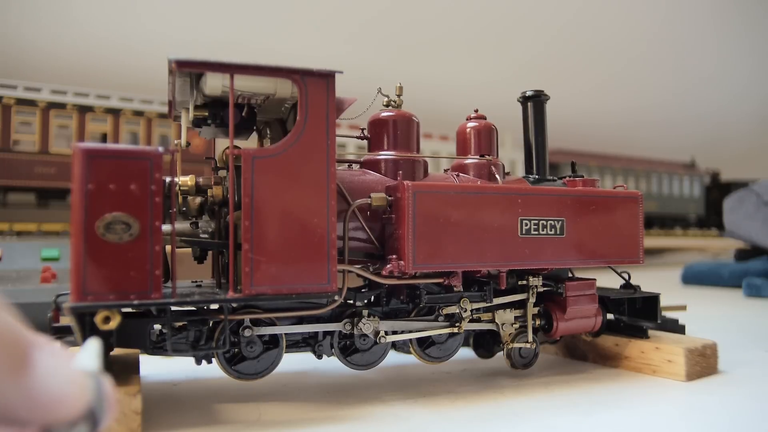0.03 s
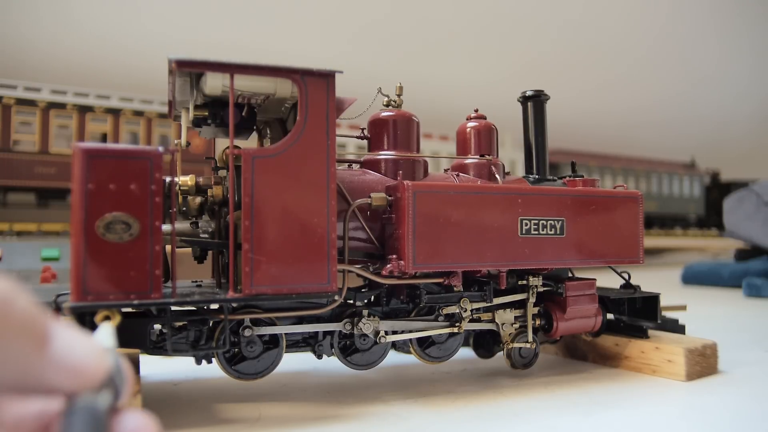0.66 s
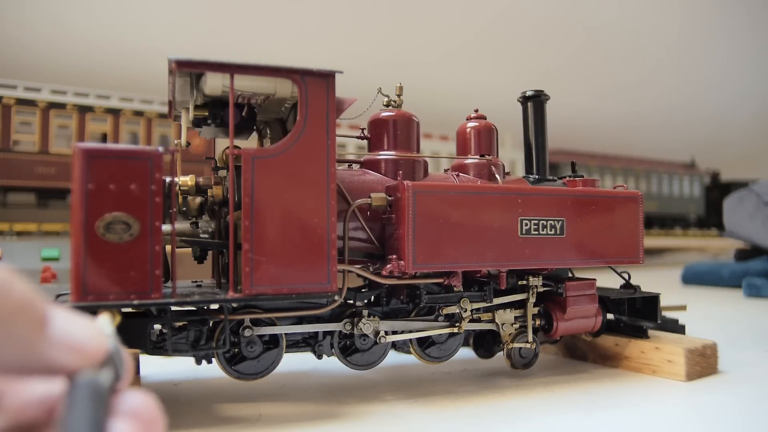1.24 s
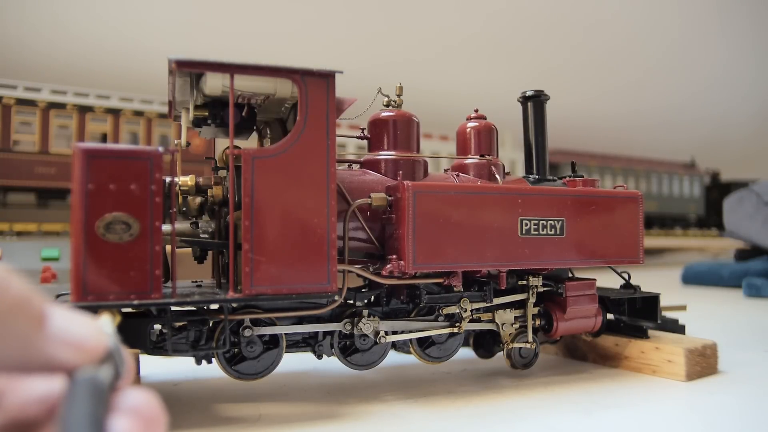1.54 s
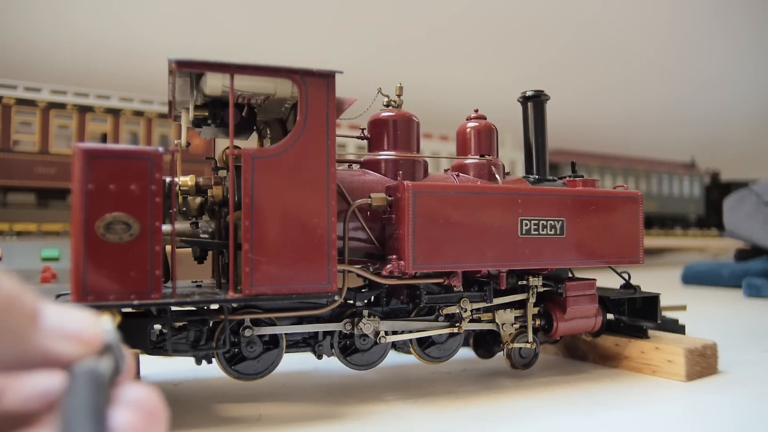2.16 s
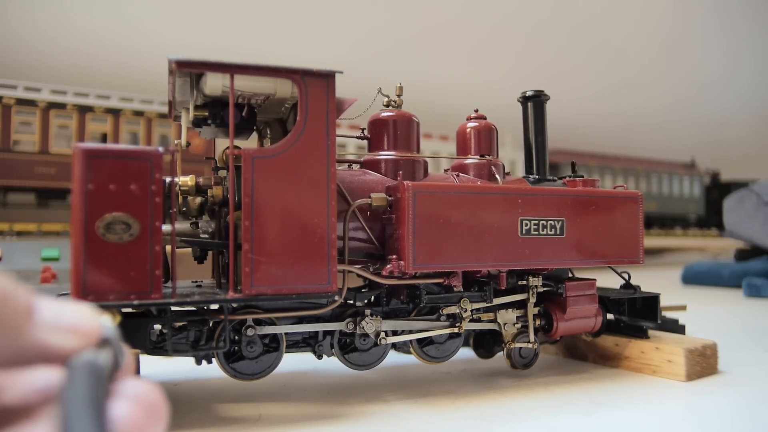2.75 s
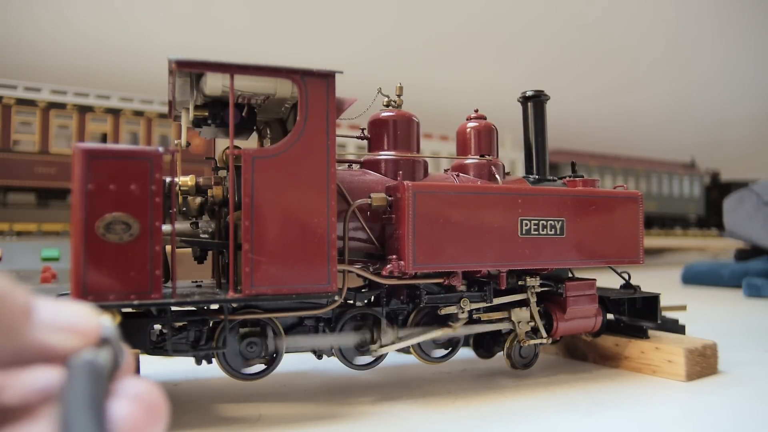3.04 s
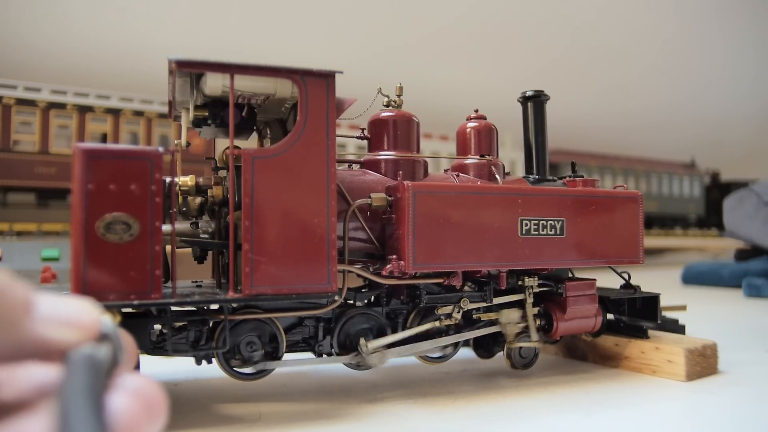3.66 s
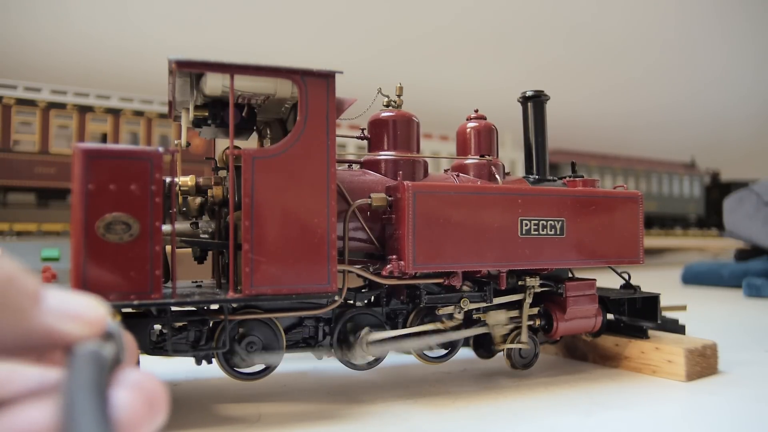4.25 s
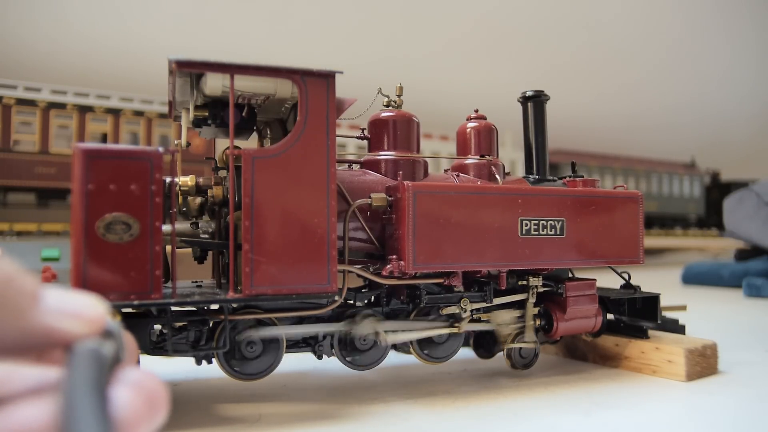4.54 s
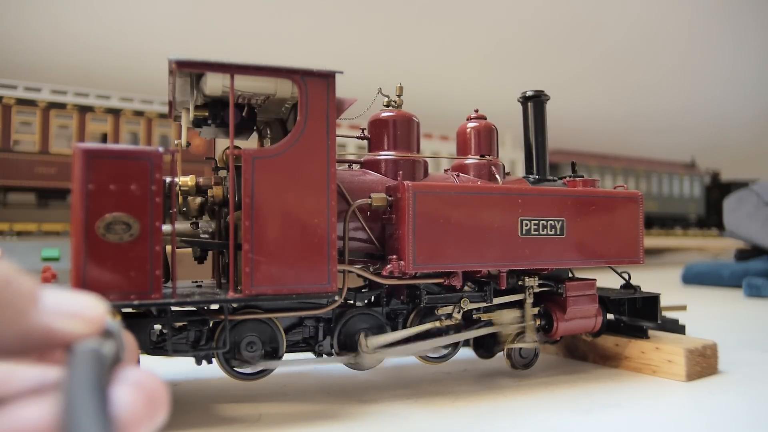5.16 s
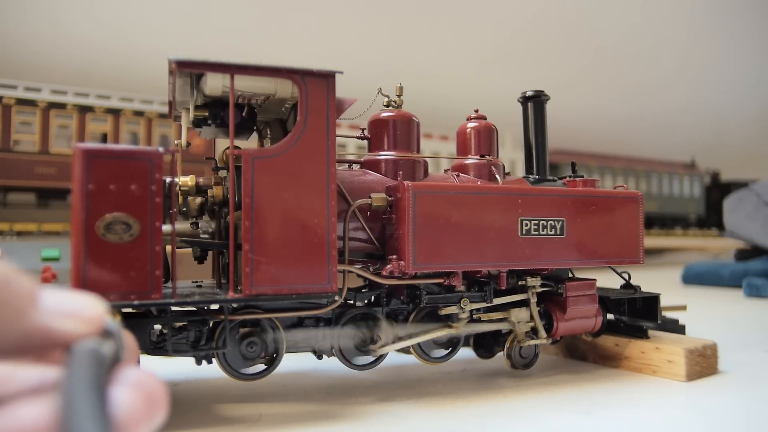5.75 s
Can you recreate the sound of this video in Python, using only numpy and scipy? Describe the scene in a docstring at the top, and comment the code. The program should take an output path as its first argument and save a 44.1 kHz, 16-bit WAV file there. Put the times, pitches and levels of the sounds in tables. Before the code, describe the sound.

A little air compressor starts with a brief surge and hums steadily, heard up close on an indoor workbench. A bright, throbbing hiss spits and whistles from a loose hose nozzle at a model locomotive's inlet. The engine begins puffing softly and rapidly as its wheels spin. Roughly two thirds through, the joint seals and the hiss sinks low, while the compressor carries on under load with a rapid valve rasp and thin squeak.

```python
"""A small piston compressor starts up and hums, close to a single microphone at an indoor bench.
Air hisses and whistles past a hose nozzle as a hand pushes it into the inlet of a model steam
locomotive on blocks. The nozzle seats, the hiss falls away and the building pressure makes the
compressor's valves rasp and squeak. The wheels begin to spin, with soft chuffs from the chimney."""
import sys
import numpy as np
from scipy import signal
from scipy.fft import rfft, irfft
from scipy.io import wavfile
from scipy.ndimage import uniform_filter1d

SR = 44100
rng = np.random.default_rng(int(sys.argv[2]) if len(sys.argv) > 2 else 0)


def generate_wav(signal):
    """Clip the signal to [-1, 1] and save it as 16-bit WAV at the path in sys.argv[1]."""
    frames = np.transpose(np.atleast_2d(signal))
    scaled = np.clip(frames, -1, 1) * 32767
    pcm = np.round(scaled).astype(np.int16)
    wavfile.write(sys.argv[1], SR, pcm)


N = 260631
T = np.arange(N) / SR


# The intake's hum, running light. Each row: multiple of the stroke rate, relative level in dB.
HUM_LIGHT_PARTIALS = [(1, -48), (2, -25.5), (3, -17), (4, -29), (5, -42), (6, -23.5), (7, -43), (8, -10.5),
                      (9, -20.5), (10, -12), (11, -5.5), (12, -3.5), (13, 1), (14, -4.5), (15, -21),
                      (16, -27), (17, -24), (18, -15.5), (19, -39), (20, -13), (21, -44), (22, -35),
                      (23, -30), (24, -30), (25, -39), (26, -15.5), (27, -12)]
# The same hum under load. Each row: multiple of the stroke rate, relative level in dB.
HUM_LOADED_PARTIALS = [(1, -40), (2, -11), (3, -11), (4, -15), (5, -38), (6, -18), (7, -20), (8, 2),
                       (9, 4.5), (10, -13), (11, 1.5), (12, 1), (13, 3.5), (14, 1.5), (15, -45), (16, -17),
                       (17, -25), (18, -13), (19, -25), (20, -18), (21, -31), (22, -28), (23, -16),
                       (24, -39), (25, -28), (26, -17), (27, -6)]

def hum(turns, speed, pressure, smear=0.0658, flutter_turns=0.00053, soft_db=7):
    """Each stroke thumps the pump body, then the gulp rings the intake; load deepens the ring."""
    order, light_db = np.transpose(HUM_LIGHT_PARTIALS)
    loaded_db = np.transpose(HUM_LOADED_PARTIALS)[1]
    share = speed / speed[-1]
    # extra load as the motor reaches full speed, soon easing
    strain = 0.92 * np.clip(2 * share - 1, 0, 1) ** 2 * np.exp(-T / 0.43)
    load = np.clip(pressure ** 2 + strain, 0, 1)
    lead_turns = 0.13 + 0.2 * load  # the body thumps ahead of the ring
    body_low, body_high = 7, 10  # multiples of the stroke rate that the body radiates
    crank = turns + flutter_turns * wander(21)
    centre = order[np.argmax(light_db)]
    partials = np.zeros(N)
    for k in range(1, 2 * len(order)):
        place = k * share  # the resonance stays put while the motor runs up
        db = (1 - load) * np.interp(place, order, light_db, right=-90)
        db += load * np.interp(place, order, loaded_db, right=-90)
        db -= soft_db * np.maximum(1 - share, 0) * abs(place - centre)  # slow gulps are soft-edged
        ahead = lead_turns * (np.clip(place, body_low, body_high) - body_high)
        phase = 2 * np.pi * (k * crank + ahead) + smear * (place - centre) ** 2
        partials += share * from_db(db) * np.cos(phase)
    return hum_gain() * unit(partials)


# The running hum at the microphone. Each row: time in seconds, level in dB before the starting kick.
HUM_LEVELS = [(.45, -43), (1.2, -44.5), (3, -42), (3.95, -41.5), (4.35, -45), (5.9, -45.5)]

def hum_gain(on_s=.05, rise_s=0.015):
    """The compressor switches on, labours loudly through its first strokes and settles."""
    switch = np.clip((T - on_s) / rise_s, 0, 1)
    kick_db = 7.5 * np.exp(-((T - .175) / 0.097) ** 2)
    return switch * from_db(follow(HUM_LEVELS, T)[0] + kick_db)


def intake_tube(x, ring_hz=354, width_hz=14, share=0.15):
    """The intake tube keeps singing faintly between gulps."""
    return (1 - share / 2) * x + share * resonate(x, ring_hz, width_hz)


# Modes of the pump head. Each row: frequency in Hz, width in Hz, relative level in dB.
HEAD_MODES = [(1290, 83, -11.5), (1776, 59, -3.5), (2207, 63, 0), (2764, 48, -3), (2920, 19, 3),
              (3490, 88, -6.5)]

def pump_head(turns, speed, pressure, rasp_db=-42, knock=1.25, pipe_db=-49):
    """The delivery valve knocks open, air rasps through the pump head, and the pipe rings on."""
    knocks = tap(turns + 0.0018 * wander(36), .82) + .5 * tap(turns + .01 * wander(30), .92)
    rush = snap(turns, 0.74, decay=0.27) * gate(turns, 0.98, spread=0.11) * rng.standard_normal(N)
    rasp = ring(unit(rush) + knock * unit(knocks), HEAD_MODES) * per_stroke(turns, 0.64, spread_db=0.34)
    tail = gate(turns, 0.18, spread=0.26) * rng.standard_normal(N)
    pipe = unit(resonate(resonate(tail, 3573, 82), 3465, 200))
    force = np.clip(pressure, 0, 1) ** 0.41 * (speed / speed[-1]) ** 2
    return force * (from_db(rasp_db) * rasp + from_db(pipe_db) * pipe)


# Modes of the outlet reed. Each row: frequency in Hz, width in Hz, relative level in dB.
REED_MODES = [(5830, 82, -9), (6577, 56, 1), (6920, 260, -15), (7120, 80, -8.5), (7370, 230, -11),
              (7800, 270, -29)]

def outlet_reed(turns, pressure, squeak_db=-44, breath=0.2):
    """Under pressure the outlet reed slaps twice a stroke and squeaks."""
    slaps = tap(turns, .52) + tap(turns + 0.0009 * wander(28), .655)
    flow = gate(turns, 0.54, spread=.035) * rng.standard_normal(N)
    squeak = ring(unit(slaps) + breath * unit(flow), REED_MODES) * per_stroke(turns, .3, spread_db=-1.75)
    return from_db(squeak_db) * np.clip(pressure, 0, 1) * squeak


# Breathy whistles at the nozzle's lip as it shifts in its seat. Each row: start and end in seconds,
# pitch in Hz, width in Hz, level in dB before the throb.
LIP_WHISTLES = [(0.03, .35, 2910, 250, -45.5), (0.03, 0.668, 10130, 320, -27),
                (0.123, 0.14, 9500, 1800, -28.5), (0.195, 0.524, 9500, 2000, -27),
                (.55, 1.6, 10540, 700, -40), (0.754, 0.865, 10500, 2400, -25),
                (0.903, 1.613, 5600, 1900, -34.5), (1.33, 1.95, 8470, 200, -53),
                (1.347, 1.646, 8600, 2190, -24), (2.046, 2.75, 7900, 200, -39.5),
                (2.1, 2.81, 1610, 450, -44), (2.113, 3, 9160, 704, -39), (2.653, 3.85, 5630, 480, -39),
                (2.7, 3.8, 6750, 400, -44), (2.9, 3.8, 4190, 350, -42.5), (3.137, 3.6, 9040, 340, -35.5),
                (3.5, 3.9, 6940, 2600, -35.5)]

def leak(turns, pressure, throb_db=3, start_throb_db=7, sputter_db=0.88, tremor_db=.5):
    """Escaping air surges with each stroke, most while the hose is empty; a loose nozzle trembles."""
    air = noise(jet_colour)
    for start, end, hz, width, db in LIP_WHISTLES:
        air = air + from_db(db) * arch(T, start, end) * whistle(hz, width)
    arrived = np.clip((T - 0.1205) / .003, 0, 1)
    trickle_db = -3.5 * (1 - arrived)  # less escapes until the first full stroke arrives
    surge = gate(turns, 0.74, spread=0.21)
    depth_db = throb_db * (1 - .5 * pressure) + start_throb_db * np.exp(-(T / 0.26) ** 2) * arrived
    unsteady_db = sputter_db * wander(170) + tremor_db * nozzle_gap(T) * wander(12)
    return air * from_db(trickle_db + depth_db * (surge - surge.mean()) + unsteady_db)


def whistle(hz, width_hz):
    """Turbulence caught in a sharp resonance; rms 1."""
    return unit(resonate(resonate(rng.standard_normal(N), hz, width_hz), hz, width_hz))


# Strength of the escaping air. Each row: time in seconds, density in dB per Hz before colouring.
JET_FLOW = [(0, -82.5), (.15, -79.5), (.24, -74), (.48, -73), (.72, -71.5), (1.25, -73), (1.9, -72.5),
            (2.12, -76), (2.4, -74), (3.3, -73), (3.8, -73), (3.92, -78.5), (4.08, -82), (4.16, -87.5),
            (5.9, -84)]
# The jet with the nozzle seated, pressed in and loose. Each row: low rush in dB, fizz in dB,
# then the gap resonance's lift in dB, frequency in Hz and width in Hz.
GAP_COLOURS = [(3.5, 1, 5, 7400, 1300), (-1.5, -5.5, 4, 9130, 3130), (-7, -0.5, 13.5, 10150, 4360)]
# The nozzle rocks and the jet's brightness shifts. Each row: start and end in seconds, fizz in dB.
JET_FLARES = [(0.872, 1.38, 2), (1.394, 1.698, -0.5), (3.514, 3.924, 8), (3.947, 4.14, 4),
              (4.72, 4.97, 4.5)]
# Resonances of the inlet pipe and cab. Each row: frequency in Hz, width in Hz, nominal lift in dB.
CAVITY_MODES = [(1450, 280, 6.4), (2230, 170, 6), (2894, 257, 3.8), (3434, 240, 6.4), (4186, 273, 3.9),
                (4535, 107, 2.8), (5445, 93, 3.6), (5703, 154, 4.1), (6167, 321, 3.1), (6571, 131, 2.8),
                (7054, 311, 3), (7932, 180, 5.4), (8430, 250, 3), (8984, 273, 2.6), (9372, 290, 6.2),
                (9901, 136, 3.2), (10374, 300, 4.8), (11423, 304, 2.6), (12031, 300, 4.4),
                (12830, 106, 3.4)]

def jet_colour(hz, t, patchy_db=1.1, open_depth=1.08, seated_depth=0.68):
    """Turbulent air, coloured by the closing gap round the nozzle and by the cavities behind it."""
    gap = nozzle_gap(t)
    rush_db, fizz_db, gap_db, gap_hz, gap_width = (
        np.interp(gap, [0, .5, 1], column) for column in np.transpose(GAP_COLOURS))
    flare_db = sum(lift_db * arch(t, start, end) for start, end, lift_db in JET_FLARES)
    flare_body = 0.14  # share of a flare that lifts the whole hiss
    flow_db = follow(JET_FLOW, t)[0] + flare_body * flare_db
    slow_jet_db = -16.5 * np.exp(-(t / 0.17) ** 2)  # little fizz until the jet is up to speed
    fizz_db = fizz_db + (1 - flare_body) * flare_db + slow_jet_db
    db = flow_db + rush_db * spectrum([(1400, 1), (5000, 0)], hz)
    db += fizz_db * spectrum([(5000, 0), (14000, 1)], hz)
    db += spectrum([(100, -65), (600, -21.0), (900, -4.5), (1300, -3.5), (5000, -1),
                    (10000, -1.5), (14000, -1.0), (16000, -5)], hz)
    db += gap_db * bell(hz, gap_hz, gap_width)
    cavity_db = sum(lift * bell(hz, centre, width) for centre, width, lift in CAVITY_MODES)
    db += np.interp(gap, [0, .5], [seated_depth, open_depth]) * cavity_db
    patches = uniform_filter1d(rng.standard_normal(db.shape), size=5, axis=0)
    patches = uniform_filter1d(patches, size=50, axis=1)
    return db + patchy_db * unit(patches)


# The hand works the nozzle home. Each row: time in seconds, gap (1 loose, .5 pressed in, 0 seated).
NOZZLE_PATH = [(.4, 0.99), (.82, 1), (1.25, 0.93), (1.5, 1), (1.8, .77), (2.1, 0.51), (3.85, 0.4),
               (4.22, .01), (4.7, .03), (5.9, 0.11)]

def nozzle_gap(t):
    """How far the nozzle stands off its seat, 0-1."""
    return np.clip(follow(NOZZLE_PATH, t)[0], 0, 1)


def back_pressure(full=0.85, seal_power=0.97, fill_s=.07):
    """The hose fills as the gap round the nozzle closes; pressure on a scale of 0-1."""
    keep = np.exp(-1 / (fill_s * SR))
    seal = (1 - nozzle_gap(T)) ** seal_power
    return full * signal.lfilter([1 - keep], [1, -keep], seal)


# Spits of air from the loose joint. Each row: start in seconds, length in seconds, level in dB.
JOINT_SPITS = [(0.117, 0.025, -38), (0.21, 0.052, -35.5), (0.595, 0.089, -38), (1.138, 0.018, -33),
               (1.196, 0.081, -30.5), (1.731, .018, -30), (1.922, 0.1, -34)]

def spits():
    """The joint lifts for an instant and lets out a coarse gush."""
    colour = [(400, -55), (1000, -17), (1400, 9.0), (2400, -8),
              (3400, 6), (4500, 7.5), (7000, -3), (15000, -7)]
    gush = unit(steady_noise(colour))
    return gush * sum(from_db(db) * np.interp(T, [s, s + 0.31 * length, s + length], [0, 1, .5], right=0)
                      for s, length, db in JOINT_SPITS)


# The locomotive's exhaust. Each row: time in seconds, chuffs per second, level in dB.
EXHAUST_BEAT = [(2.95, 2, -85), (3.2, 7.5, -47.5), (4.2, 10, -50.5), (5.3, 9, -50), (5.9, 11, -54)]

def chuffs():
    """Spent air puffs softly up the chimney as the wheels spin."""
    rate, level_db = follow(EXHAUST_BEAT, T)
    puffs = gate(np.cumsum(rate) / SR, .5, spread=.28)
    chimney = steady_noise([(200, -13), (500, -14.5), (800, 1.5), (1300, -16), (2500, 2), (8000, -23.5)])
    return from_db(level_db) * unit(chimney * puffs)


# Motor and bearings, behind the hum. Each row: frequency in Hz, relative density in dB.
WHIRR_SPECTRUM = [(20, -104), (45, -89), (100, -86), (200, -81), (400, -74.5), (520, -79), (630, -80.5),
                  (750, -73), (1000, -75.5), (1350, -75), (1700, -78), (3000, -86), (6000, -80.5),
                  (16000, -105)]

def motor(speed, pressure, load_db=3):
    """A broad mechanical whirr that grows with speed and load."""
    return steady_noise(WHIRR_SPECTRUM) * speed / speed[-1] * from_db(load_db * (pressure - 2.5))


def bench_reflections(x, count=90, reflected_db=-8.5):
    """Bench top, engine body and wall reflect to the microphone, 3-40 ms behind the direct sound."""
    delay_s = rng.uniform(.003, .04, count)
    echoes = rng.choice([-1, 1], count) * np.exp(-delay_s / .02)
    response = np.zeros(SR // 20)
    np.add.at(response, (delay_s * SR).astype(int), echoes)
    response *= from_db(reflected_db) / np.linalg.norm(response)
    response[0] = 1
    return signal.oaconvolve(x, response / np.linalg.norm(response))[:N]


# The room around the bench. Each row: frequency in Hz, density in dB per Hz.
ROOM_SPECTRUM = [(20, -104), (50, -102), (120, -101.5), (300, -93), (1000, -99), (4000, -100),
                 (16000, -112)]

def room_tone():
    """Still indoor air, faint behind everything else."""
    return steady_noise(ROOM_SPECTRUM)


def from_db(db):
    """Decibels to gain."""
    return 10 ** (np.asarray(db) / 20)


def unit(x):
    """Scales to rms 1."""
    return x / np.sqrt(np.mean(x ** 2) + 1e-20)


def follow(rows, t):
    """Each column of a curve table at the times t."""
    s, *columns = np.transpose(rows)
    return [np.interp(t, s, column) for column in columns]


def spectrum(points, hz):
    """Joins (Hz, dB) points on a log-frequency axis."""
    f, db = np.transpose(points)
    return np.interp(np.log(hz + 1), np.log(f), db)


def wander(hz):
    """Random drift of rms 1, no faster than about hz."""
    f = np.fft.rfftfreq(N, 1 / SR)
    return unit(irfft(rfft(rng.standard_normal(N)) * np.exp(-(f / hz) ** 2), N))


def noise(colour):
    """Noise whose density in dB per Hz is colour(Hz as a column, s as a row)."""
    hz, t, white = signal.stft(rng.standard_normal(N), SR, nperseg=768, noverlap=576)
    shaped = white * from_db(colour(hz[:, None], t))
    return np.sqrt(SR / 2) * signal.istft(shaped, SR, nperseg=768, noverlap=576)[1][:N]


def steady_noise(points):
    """Noise of one colour, set by (Hz, dB per Hz) points."""
    return noise(lambda hz, t: spectrum(points, hz))


def bell(hz, centre_hz, width_hz):
    """Shape of a resonance, 1 at its centre."""
    return 1 / (1 + (2 * (hz - centre_hz) / width_hz) ** 2)


def resonate(x, hz, width_hz):
    """A resonance of gain 1."""
    turn = np.exp(2j * np.pi * np.cumsum(hz * np.ones(N)) / SR)
    r = np.exp(-np.pi * width_hz / SR)
    return 2 * (turn * signal.lfilter([1 - r], [1, -r], x / turn)).real


def ring(x, modes):
    """Passes x through a set of modes of alternating sign; rms 1."""
    return unit(sum((-1) ** k * from_db(db) * resonate(x, hz, width)
                    for k, (hz, width, db) in enumerate(modes)))


def arch(t, start, end):
    """Swells from 0 to 1 and back between start and end."""
    return np.sin(np.pi * np.clip((t - start) / (end - start), 0, 1))


def gate(turns, at, spread):
    """A smooth opening once a turn, centred on the crank position at."""
    return np.exp(-.5 * (((turns - at + .5) % 1 - .5) / spread) ** 2)


def snap(turns, at, decay):
    """Opens sharply once a turn and dies away; decay is in turns."""
    return np.exp(-((turns - at) % 1) / decay)


def tap(turns, at):
    """One click a turn, at the crank position at."""
    return np.diff(np.floor(turns - at), prepend=np.floor(turns[0] - at))


def per_stroke(turns, at, spread_db):
    """A random gain for each stroke, renewed at the crank position at."""
    stroke = np.floor(turns - at).astype(int)
    return from_db(spread_db * rng.standard_normal(stroke.max() + 4)[stroke])


# The compressor runs up and holds its speed. Each row: time in seconds, strokes per second.
STROKE_RATE = [(0, 8), (.12, 15), (.22, 26.3), (.3, 27.6), (.6, 27.26), (1.2, 27.17), (2.2, 27.13),
               (3.9, 27.14), (4.4, 27.04), (5.9, 27.1)]

def scene():
    """Compressor, locomotive and room at one close microphone, the same in both ears."""
    speed, = follow(STROKE_RATE, T)
    pressure = back_pressure()
    turns = np.cumsum(speed) / SR + .08
    valves = outlet_reed(turns, pressure) + pump_head(turns, speed, pressure)
    compressor = intake_tube(hum(turns, speed, pressure)) + valves + motor(speed, pressure)
    locomotive = bench_reflections(leak(turns, pressure) + spits() + chuffs())
    mix = compressor + locomotive + room_tone()
    return np.array([mix, mix])


def record(dry):
    """The recorder's steep band limit cuts off the highest treble."""
    cutoff_hz = 15750
    taps = signal.firwin(1023, cutoff_hz, window=("kaiser", 9), fs=SR)
    return signal.oaconvolve(dry, taps[None], "same")


dry = scene()
out = record(dry)
generate_wav(out)
```